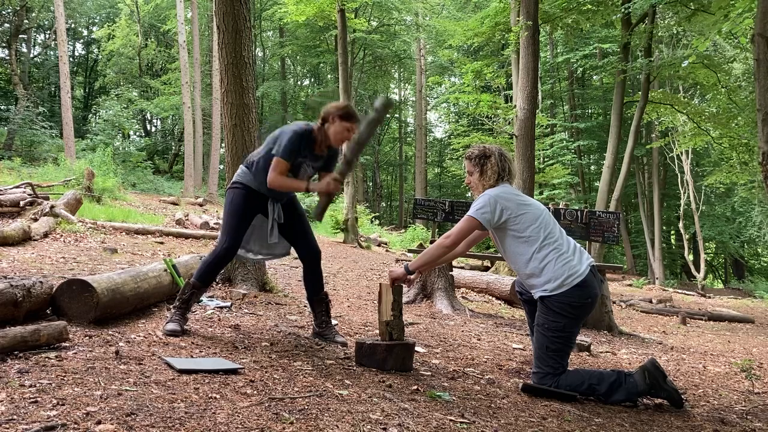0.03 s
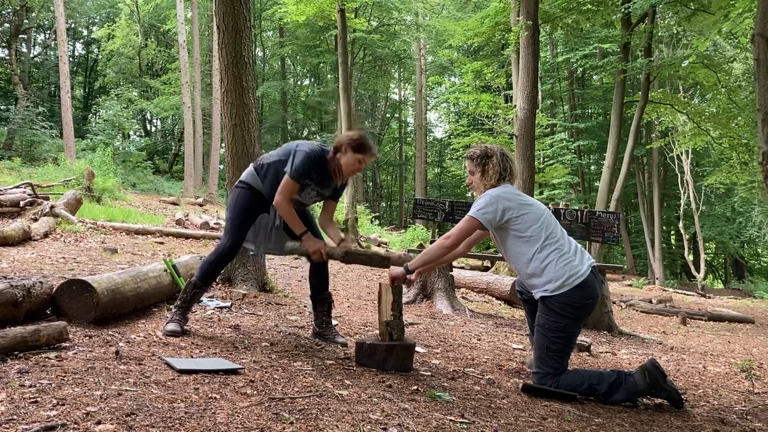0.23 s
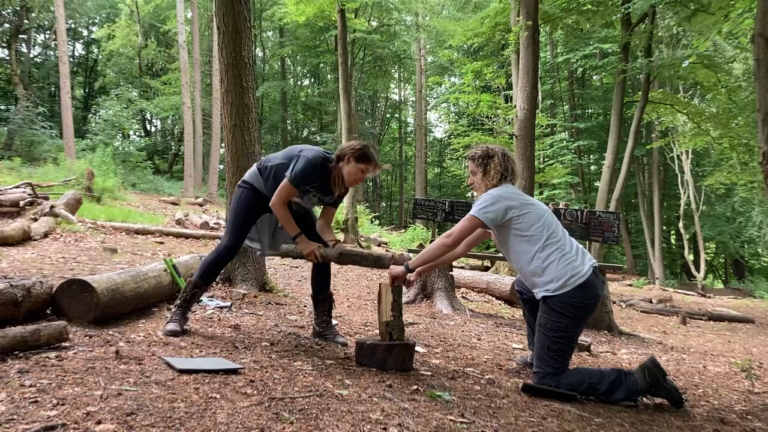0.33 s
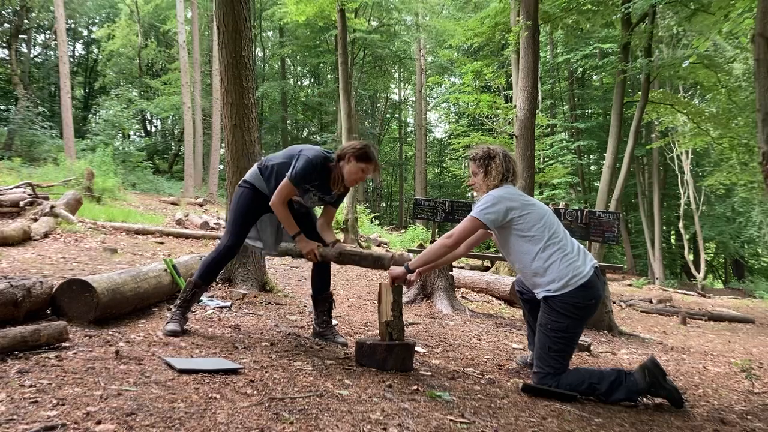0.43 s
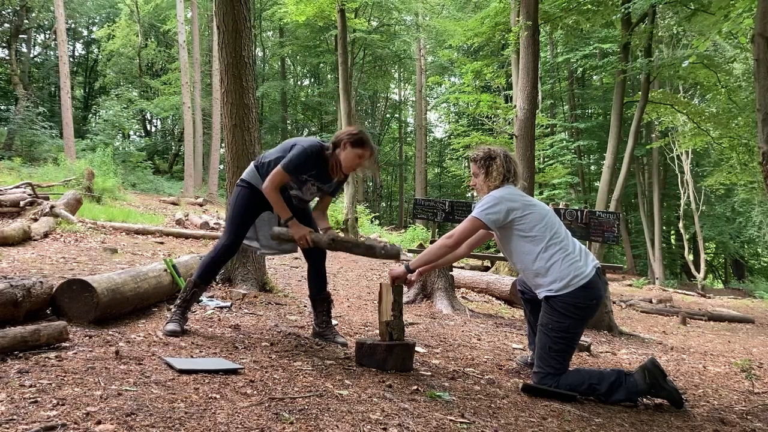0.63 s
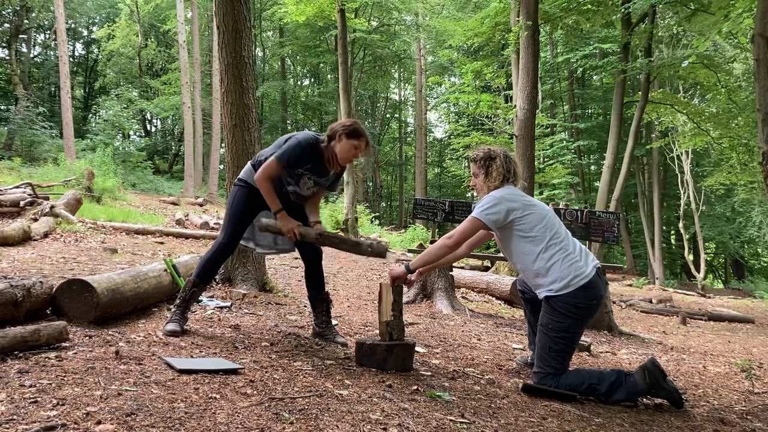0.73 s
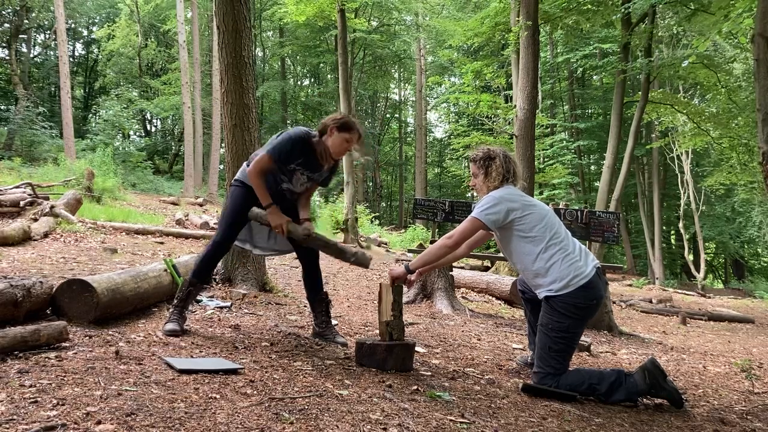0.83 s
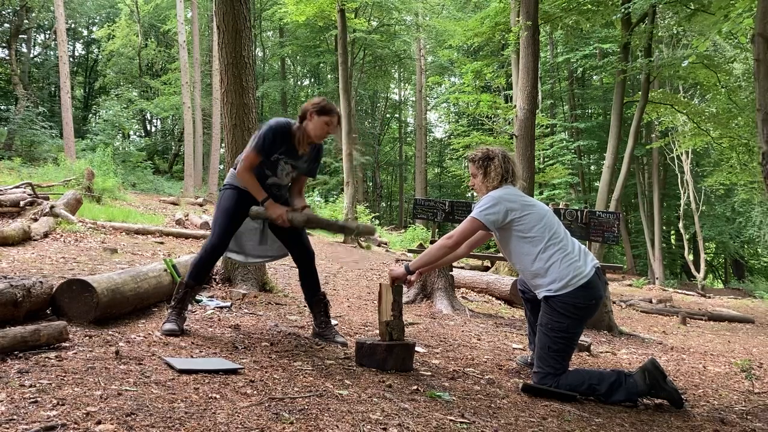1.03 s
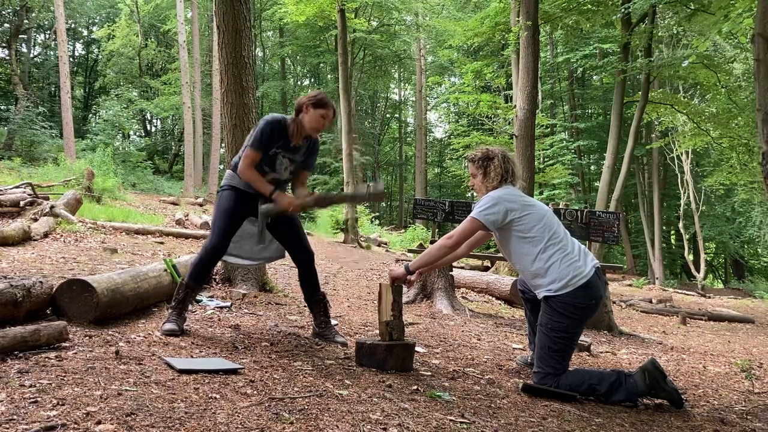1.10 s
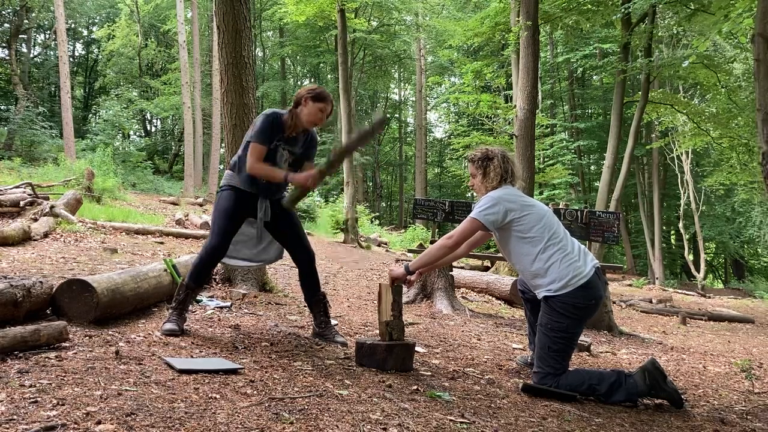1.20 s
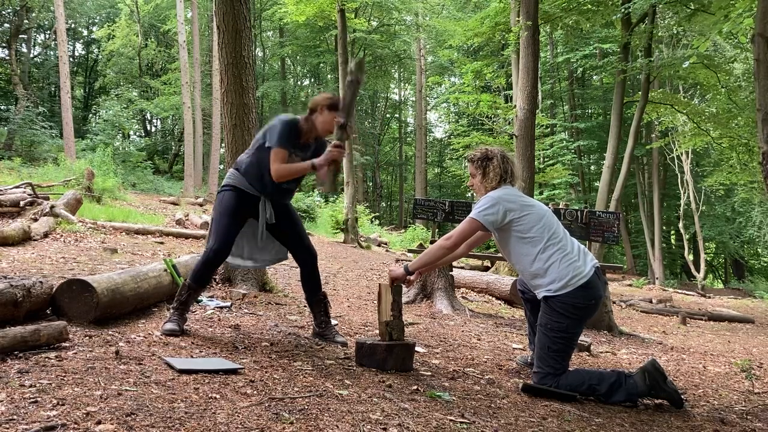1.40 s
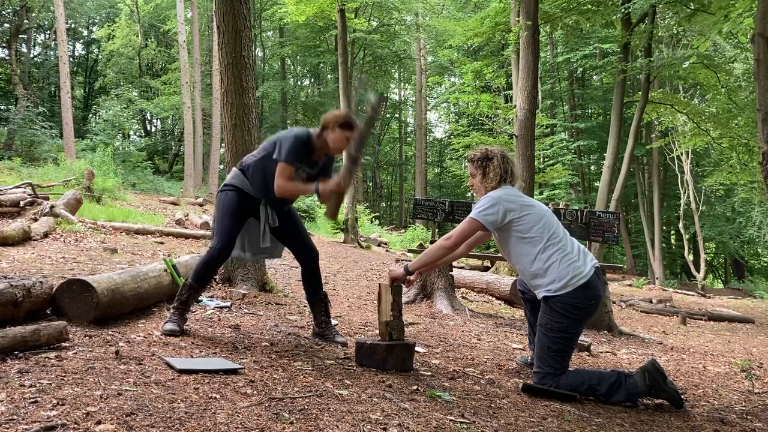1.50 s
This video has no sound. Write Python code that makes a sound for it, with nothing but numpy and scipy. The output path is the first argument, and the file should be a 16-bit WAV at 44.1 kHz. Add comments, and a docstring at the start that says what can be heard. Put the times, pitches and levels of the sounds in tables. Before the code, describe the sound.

A wooden club hits the back of a blade once, close in front, driving it into a log with a crack and thud. A soft knock and hollow echo follow, while small birds chirp in the surrounding woods.

```python
"""In a wood, on a two-port microphone: a low, distant rumble and small birds calling near and far.
At 0.23 s, close in front, a wooden club strikes the back of a billhook and drives it into a log on a
block. Fibres crack, club and blade ring, the block thuds on the soil, and the trees scatter the blow.
At 0.37 s the blade ticks in the cut and the wood settles with a soft double knock.
A hollow echo rolls back from the far trees, a bird chirps four times, and other calls follow."""
import sys
import numpy as np
from scipy import signal
from scipy.fft import rfft, irfft, next_fast_len
from scipy.io import wavfile
from scipy.ndimage import uniform_filter1d

SR = 44100
rng = np.random.default_rng(int(sys.argv[2]) if len(sys.argv) > 2 else 0)


def put_to_file(sound):
    """Save the sound as 16-bit audio at rate SR, in the file named by the first command-line argument."""
    columns = np.atleast_2d(sound).T  # one column per channel
    safe = np.clip(columns, -1, 1)
    whole_steps = np.round(safe * 32767)
    wavfile.write(sys.argv[1], SR, whole_steps.astype(np.int16))


N = 68355

# distant rumble and leaf hiss: band_hz, level_db
AIR_BANDS = [(25, -80), (45, -70), (70, -64.5), (110, -62), (170, -75), (300, -77), (600, -82),
             (950, -79.5), (1600, -87), (3000, -85.5), (5000, -87), (6800, -82.5), (9000, -102),
             (11500, -93), (15000, -114)]
# the fading echo of a far song: band_hz, level_db, t60_s
FAR_SONG_BANDS = [(1200, -100, 1), (1900, -73.5, 0.36), (2800, -63, 0.37), (3940, -75.5, 3),
                  (5300, -75.5, .8), (8080, -88, 1.8)]
# bird calls far off, one curve each: time_s, pitch_hz, level_db
FAR_CALLS = [
    [(0, 3250, -64), (.04, 2256, -60)],
    [(1.365, 2500, -64), (1.382, 2740, -65.5), (1.398, 3370, -60.5)],
    [(1.415, 3700, -60.5), (1.433, 3420, -55.5), (1.46, 3490, -82)],
]
# bird calls near the microphone, one curve each: time_s, pitch_hz, level_db
NEAR_CALLS = [
    [(.052, 5650, -68.5), (.076, 5400, -59), (.091, 4640, -53.5), (.105, 4680, -63)],
    [(.19, 6150, -70), (.21, 5680, -54.5), (.228, 5501, -60)],
    [(.441, 7150, -54), (.452, 6635, -49.5), (.478, 7290, -50), (.53, 7486, -61.5), (.572, 7512, -50.5),
     (.6, 7470, -73)],
    [(1.087, 7520, -59), (1.098, 8224, -55.5), (1.11, 7590, -49.5), (1.122, 6600, -45.5),
     (1.132, 7200, -43.5), (1.142, 7850, -51), (1.155, 7040, -53.5), (1.17, 6690, -48)],
    [(1.245, 4580, -65.5), (1.261, 4566, -42.5), (1.276, 4428, -51), (1.31, 4331, -41.5), (1.35, 4315, -50),
     (1.385, 4184, -62)],
    [(1.424, 6500, -57), (1.438, 7810, -50), (1.452, 8420, -45), (1.46, 8920, -72)],
    [(1.52, 6200, -58.5), (1.538, 5900, -60.5), (1.55, 5650, -50.5)],
]
# the curve of one falling chirp: offset_s, base_pitch_hz, relative_db
CHIRP_SHAPE = [(0, 4853, -8.5), (.006, 5794, -12), (0.015, 4645, 0.5), (0.023, 3836, -8), (.038, 3480, -17),
               (0.048, 3260, -9)]
# the repeats of that chirp: start_s, pitch_ratio, level_db
CHIRP_REPEATS = [(0.647, 1.02, -47.5), (.765, 1.008, -46), (0.878, .99, -47.5), (0.992, 1.005, -46)]
# the hollow roll from the far trees: band_hz, level_db, t60_s
ROLL_BANDS = [(402, -82.5, 0.5), (694, -61, 1), (960, -57.5, 1), (1170, -64.5, 0.88), (2250, -68.5, 0.78),
              (4240, -63.5, 0.56), (8150, -110, 0.38)]
# the blow's reverberation among the trees: band_hz, level_db, t60_s
FOREST_BANDS = [(35, -65, .5), (85, -42, 0.95), (170.8, -42, 0.42), (350, -43.5, 0.66), (600, -52, 0.49),
                (800, -49.5, 0.81), (1000, -43, .6), (1500, -51, .55), (2500, -47.5, 0.51),
                (4200, -49, 0.32), (7000, -41.5, 0.26), (9000, -49, .3), (11500, -46.5, .3),
                (15000, -70, .2)]
# echoes from big trunks: delay_s, gain_db
TRUNK_ECHOES = [(.056, -19), (.072, -22), (.11, -30)]
# scatter from the ground and things close by: band_hz, level_db, t60_s
GROUND_BANDS = [(80, -60.5, .1), (200, -35, 0.2), (500, -34, .1), (1000, -32, .08), (2497, -40, .07),
                (4500, -36.5, .07), (7000, -34.5, .07), (9000, -43.5, .07), (11500, -41.5, .06),
                (15000, -56, .05)]
# the blade shifting in the cut: band_hz, level_db, t60_s
TICK_BANDS = [(304, -63, 0.059), (1490, -52, .06), (3940, -59, 0.068), (7000, -55, 0.077),
              (9200, -55, 0.12), (12100, -60, 0.068), (15000, -75, .04)]
# soft knocks as the wood settles: start_s, gain_db
KNOCK_HITS = [(.366, -10), (.374, -14.5)]
# their dull ring: band_hz, level_db, t60_s
KNOCK_BANDS = [(30, -63.5, 0.14), (80.14, -44.5, 0.3), (170, -41.5, .14), (260, -43, 0.17),
               (370, -41, 0.078), (535.6, -33, 0.057), (690, -32, .08), (1000, -54, 0.105),
               (1600, -50, 0.11), (2480, -81, .05), (5000, -93, 0.046)]
# the hum of the settling log: pitch_hz, level_db, t60_s
SETTLE_MODES = [(302, -27.5, 0.066), (372, -30.5, 0.114)]
# jolts as the blade bites: delay_s, gain_db
BITE_JOLTS = [(0, -2), (.001, 1.5), (.003, -9.5)]
# splitting fibres: band_hz, level_db, t60_s
CRACK_BANDS = [(150, -61, 0.02), (345, -24.5, .03), (600, -21, .03), (1100, -19, .022),
               (2200, -21.5, 0.021), (3970, -25, 0.012), (6997, -25, .018), (8600, -25.5, .02),
               (11500, -21.5, .02), (15000, -39.5, 0.021)]
# club, blade and log ringing together: pitch_hz, relative_db, t60_s
STRUCK_MODES = [(154.2, -14, 0.093), (206.6, -13.5, .07), (318, -19, 0.18), (361, -29.5, .14),
                (411.8, -23, .06), (460, -14.5, 0.073), (517.4, -23.5, 0.082), (660.4, -26, .07),
                (755, -17.5, 0.031), (843, -19.5, .1), (945, -14.5, 0.084), (1005, -14, .04),
                (1110, -22.5, 0.058), (1205, -21, 0.042), (1575, -18.5, 0.061), (1760, -24.5, .03),
                (1950, -22, .025), (2236, -13, 0.035), (2464, -27, 0.041), (2819, -26.5, .025),
                (4135, -26.5, 0.048)]
# the faint lingering ring of the steel: pitch_hz, relative_db, t60_s
STEEL_MODES = [(2930, -51.5, .55), (3896, -56.5, 1), (4120, -54.5, .4)]
# the microphone's two ports: frequency_hz, left_lead_rad, left_minus_right_db
MIC_PORTS = [(70, 0, -2.4), (200, 0, -.8), (500, .5, -1), (1000, .1, 0), (2000, .7, .7), (4000, .7, 0),
             (6500, .4, 0), (8000, 1.9, .3), (12000, 2, 1)]

BLOW_S = .2293
DIFFUSE_HZ = 660  # below this, sound from all around is much alike at both ports


def undb(db):
    """Decibels to gain."""
    return 10 ** (np.asarray(db) / 20)


def since(start):
    """Seconds since a moment, zero before it."""
    return np.maximum(np.arange(N) / SR - start, 0)


def fade(t, rise_s, t60_s):
    """A quick rise and an exponential decay."""
    return (1 - np.exp(-t / rise_s)) * np.exp(-np.log(1000) * t / t60_s)


def lookup(table, hz):
    """The columns of a table at a frequency, joined on a log axis."""
    freqs, *columns = np.array(table, float).T
    return [np.interp(np.log(hz + 1e-3), np.log(freqs), column) for column in columns]


def filtered(x, gain):
    """Filter by a function of frequency."""
    size = next_fast_len(2 * N)
    hz = np.arange(size // 2 + 1) * SR / size
    return irfft(rfft(x, size) * gain(hz), size)[..., :N]


def wander(rate_hz):
    """A smooth random drift with a spread near 1."""
    hold = int(SR / rate_hz)
    steps = np.repeat(rng.standard_normal(N // hold + 1), hold)
    return uniform_filter1d(steps, hold)[:N]


def noise_bands(diffuse):
    """Third-octave noises: mono, or if diffuse, a pair that grows wider toward the treble."""
    freqs = np.arange(N // 2 + 1) * SR / N + 1e-3
    for hz in 25 * 2 ** (np.arange(29) / 3):
        shape = np.cos(np.pi / 2 * np.clip(3 * np.log2(freqs / hz), -1, 1))
        spectrum = rng.standard_normal((2, len(freqs))) + 1j * rng.standard_normal((2, len(freqs)))
        noise = irfft(shape * spectrum, N)
        mid, side = noise / noise.std(axis=1, keepdims=True)
        width = hz ** 2 / (hz ** 2 + DIFFUSE_HZ ** 2)
        yield hz, (mid + np.outer([1, -1], width * side) if diffuse else mid)


def burst(table, hits, rise_s, diffuse=False):
    """Noise that swells at each hit (start_s, gain_db) and dies away band by band."""
    total = 0
    for hz, noise in noise_bands(diffuse):
        db, t60 = lookup(table, hz)
        envelope = sum(undb(db + hit_db) * fade(since(start), rise_s, t60) for start, hit_db in hits)
        total = total + noise * envelope
    return total


def ring(modes, start, rise_s):
    """Damped modes set going by a push; successive modes swing in opposite directions."""
    t = since(start)
    return sum((-1) ** k * undb(db) * fade(t, rise_s, t60) * np.sin(2 * np.pi * hz * t)
               for k, (hz, db, t60) in enumerate(modes))


def from_front(x):
    """Sound from in front reaches the two ports with a small difference of phase and level."""
    def gain(hz):
        phase, db = lookup(MIC_PORTS, hz)
        return np.exp(np.outer([.5, -.5], 1j * phase + np.log(undb(db))))
    return filtered(x, gain)


def air(flicker_db=2.5):
    """A low, distant rumble and a faint hiss of leaves, each band flickering on its own."""
    return sum(undb(lookup(AIR_BANDS, hz)[0] + flicker_db * wander(rate_hz=8)) * noise
               for hz, noise in noise_bands(diffuse=True))


def whistle(curve, waver):
    """One nearly pure bird note along a curve of pitch and level."""
    times, hz, db = np.array(curve, float).T
    t = since(0)
    pitch = uniform_filter1d(np.interp(t, times, hz), size=200) * waver
    sounding = (t >= times[0]) & (t <= times[-1])
    loudness = uniform_filter1d(undb(np.interp(t, times, db)) * sounding, size=130)
    return loudness * np.sin(2 * np.pi * np.cumsum(pitch) / SR)


def birds(flutter_db=1.5, wet_db=-3):
    """Small birds in the canopy; every note lingers among the trees, and the far ones are all echo."""
    waver = 1 + .003 * wander(rate_hz=250)
    flutter = undb(flutter_db * wander(rate_hz=120))
    chirps = [[(start + offset, hz * ratio, db + level) for offset, hz, db in CHIRP_SHAPE]
              for start, ratio, level in CHIRP_REPEATS]
    near = flutter * sum(whistle(curve, waver) for curve in chirps + NEAR_CALLS)
    far = sum(whistle(curve, waver) for curve in FAR_CALLS)
    early = undb(1) * fade(since(0), rise_s=.003, t60_s=.15)
    late = fade(since(0), rise_s=.005, t60_s=.88)
    canopy = rng.standard_normal((2, N)) * (early + late)
    canopy /= np.sqrt(np.sum(canopy ** 2, axis=1, keepdims=True))
    into_trees = undb(wet_db) * near + far
    echo = signal.fftconvolve(into_trees[None], canopy, axes=1)[:, :N]
    far_song = burst(FAR_SONG_BANDS, [(0, .0069)], rise_s=.0011, diffuse=True)
    return from_front(near) + echo + far_song


def forest_tail(note_hz=894, width_hz=51, note_db=9):
    """The trees scatter the blow and roll it back late from far off; the wood's main note stands out."""
    scatter = burst(FOREST_BANDS, [(BLOW_S + .003, 0)], rise_s=.012, diffuse=True)
    roll = burst(ROLL_BANDS, [(BLOW_S + .18, 0)], rise_s=.026, diffuse=True)
    return filtered(scatter + roll, lambda hz: undb(note_db * np.exp(-((hz - note_hz) / width_hz) ** 2)))


def trunk_echoes(hit, centre_hz=960, width_octaves=.45, port_lag_s=.000291):
    """Big trunks throw back the middle of the blow's spectrum, from alternate sides."""
    hollow = filtered(hit, lambda hz: np.exp(-.5 * (np.log2((hz + 1) / centre_hz) / width_octaves) ** 2))
    t = since(0)
    echoes = np.zeros((2, N))
    for k, (delay, db) in enumerate(TRUNK_ECHOES):
        for port, lag in enumerate([0, (-1) ** k * port_lag_s]):
            echoes[port] += undb(db) * np.interp(t - delay - lag, t, hollow)
    return echoes


def settle():
    """The blade ticks in the cut, and the settling log knocks twice and hums briefly."""
    tick = burst(TICK_BANDS, [(.3665, 0)], rise_s=.00067)
    knocks = burst(KNOCK_BANDS, KNOCK_HITS, rise_s=.0022)
    hum = ring(SETTLE_MODES, start=KNOCK_HITS[0][0], rise_s=.0096)
    return tick + knocks + hum


def block_thud(end_hz=76.5, sag_hz=302, sag_s=.0045, rise_s=.0048, length_s=.041):
    """The block bounces: a few deep cycles, soon smothered, that sag in pitch as the soil gives way."""
    t = since(BLOW_S + .0026)
    cycles = end_hz * t + sag_hz * sag_s * (1 - np.exp(-t / sag_s))
    envelope = (1 - np.exp(-t / rise_s)) * np.exp(-2 * (t / length_s) ** 2)
    return undb(-9.5) * envelope * np.sin(2 * np.pi * cycles)


def club_blow():
    """Fibres crack in quick jolts, wood and blade ring, the block thuds a moment later."""
    jolts = [(BLOW_S + delay, db) for delay, db in BITE_JOLTS]
    crack = burst(CRACK_BANDS, jolts, rise_s=.00038)
    ringing = undb(.5) * ring(STRUCK_MODES + STEEL_MODES, start=BLOW_S + .00016, rise_s=.0006)
    return crack + ringing + block_thud()


def scene(bass_pan_db=-3.5):
    """The block in front of the microphone; echoes, air and birds all around."""
    def bass_to_right(hz):
        return undb(np.outer([.5, -.5], bass_pan_db / (1 + (hz / DIFFUSE_HZ) ** 2)))
    hit = club_blow()
    ground = burst(GROUND_BANDS, [(BLOW_S, 0)], rise_s=.003, diffuse=True)
    around = filtered(ground + forest_tail() + trunk_echoes(hit) + air(), bass_to_right)
    return from_front(hit + settle()) + around + birds()


def record(dry, low_cut_hz=34, top_hz=16200, ceiling=.95):
    """The microphone has a narrow treble dip; the recorder thins the bass, rounds peaks, cuts the top."""
    dip_hz, dip_width_hz, dip_db = 9070, 600, -14
    thin = signal.sosfilt(signal.butter(2, low_cut_hz, "high", fs=SR, output="sos"), dry)
    dipped = filtered(thin, lambda hz: undb(dip_db * np.exp(-((hz - dip_hz) / dip_width_hz) ** 2)))
    rounded = dipped / (1 + (dipped / ceiling) ** 4) ** .25
    return signal.sosfilt(signal.ellip(8, .2, 70, top_hz, fs=SR, output="sos"), rounded)


dry = scene()
out = record(dry)
put_to_file(out)
```